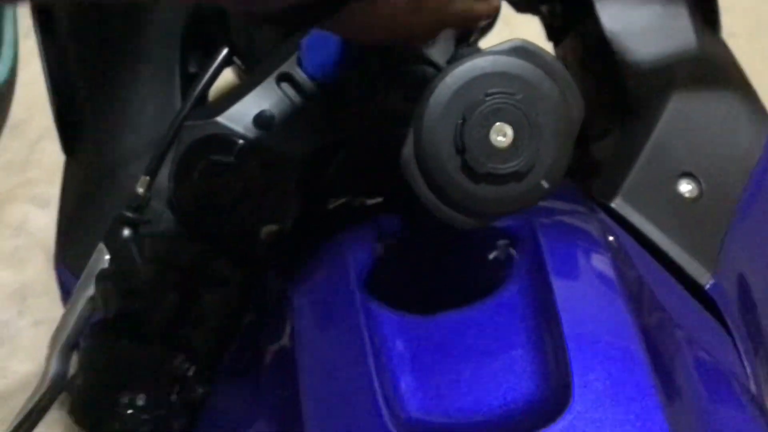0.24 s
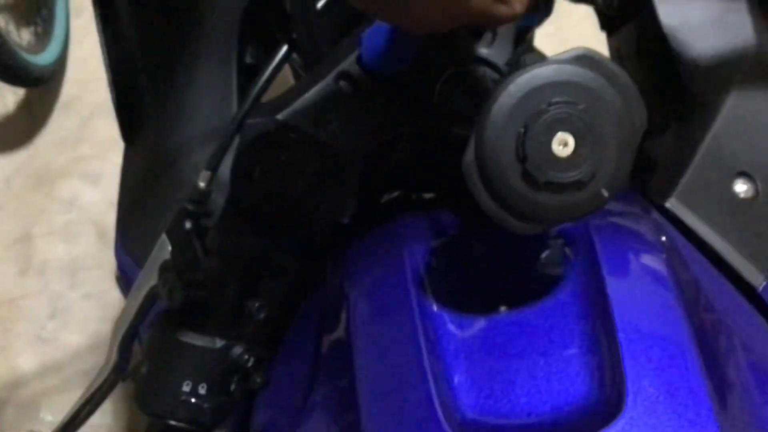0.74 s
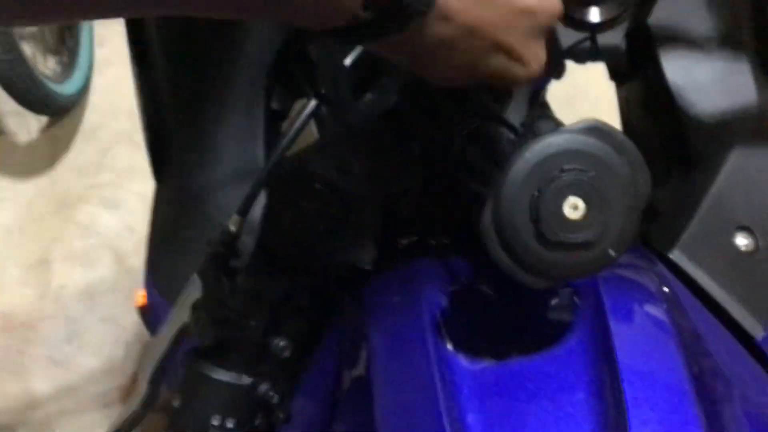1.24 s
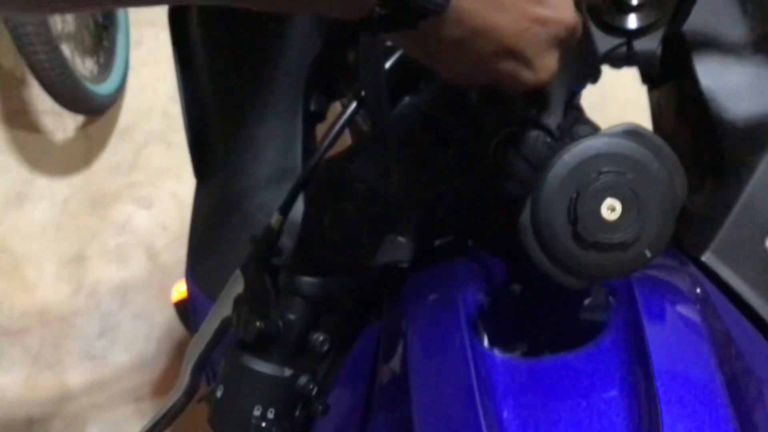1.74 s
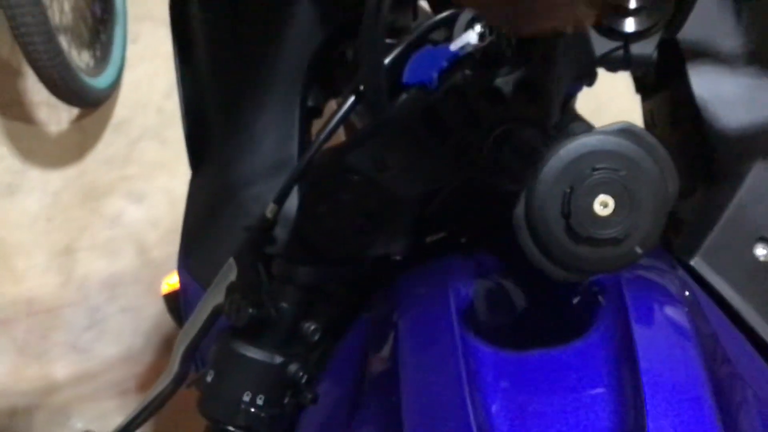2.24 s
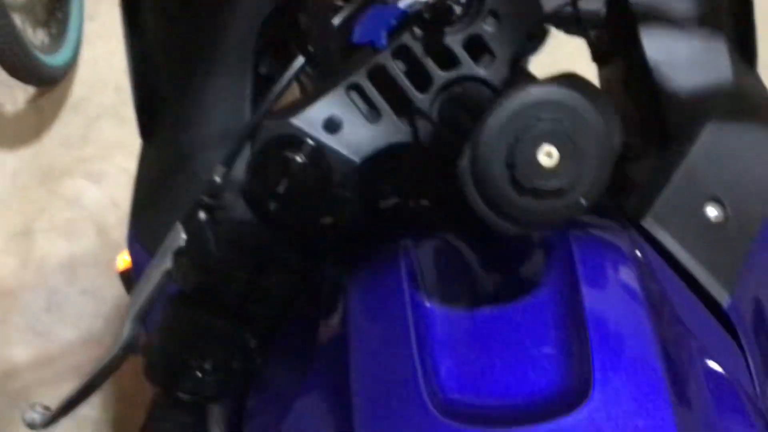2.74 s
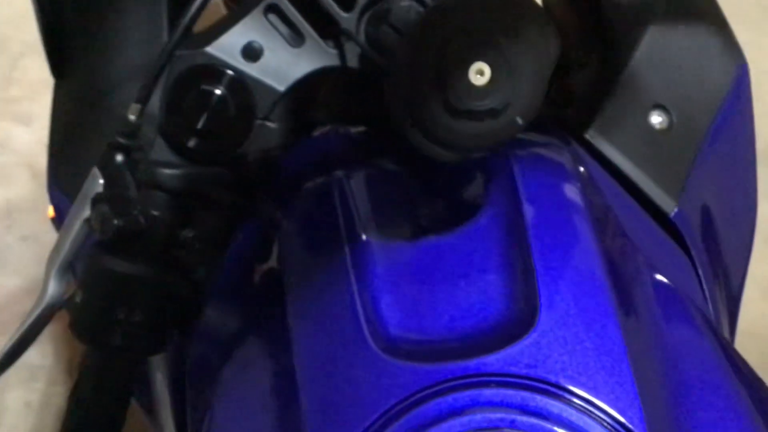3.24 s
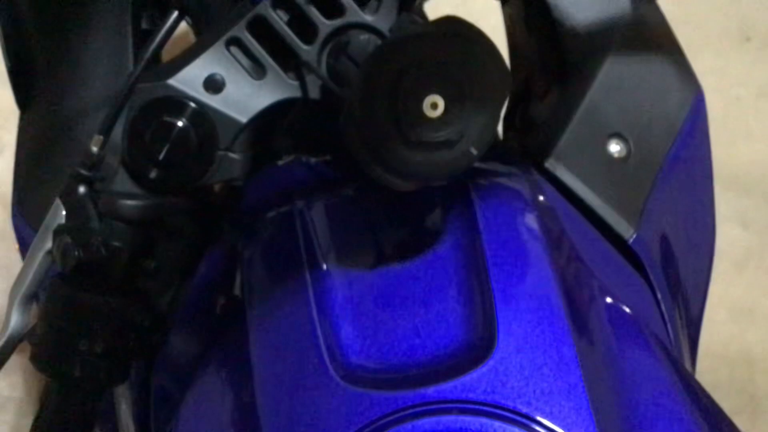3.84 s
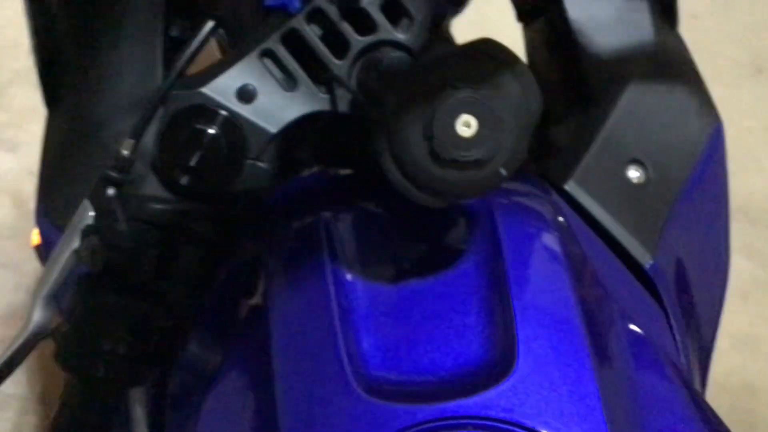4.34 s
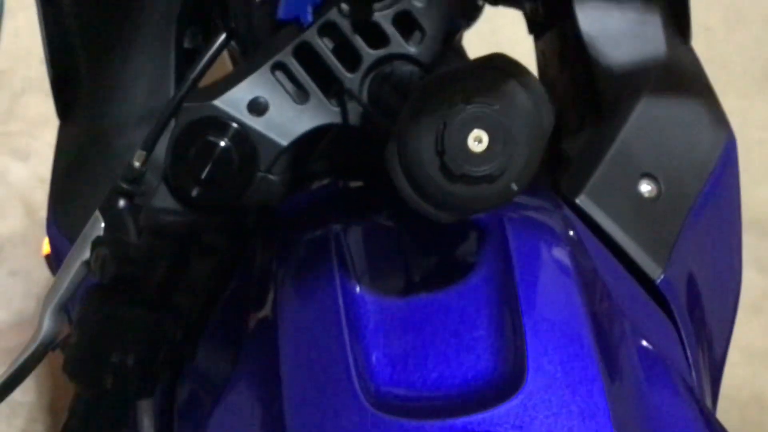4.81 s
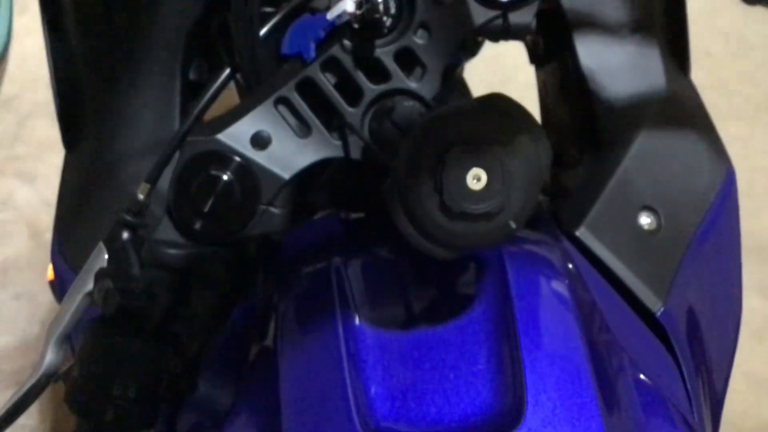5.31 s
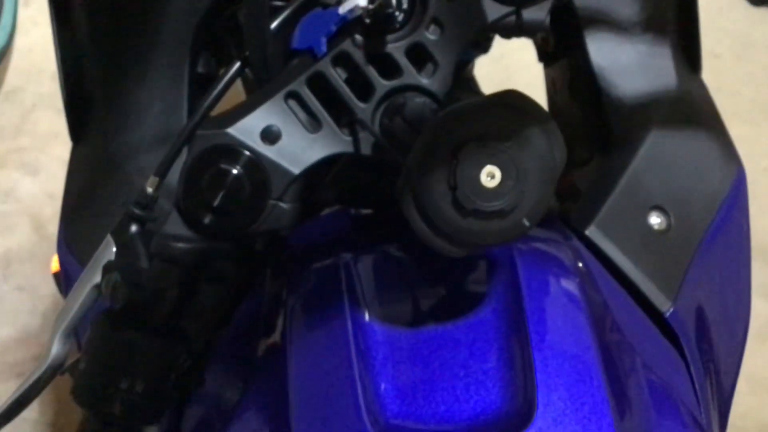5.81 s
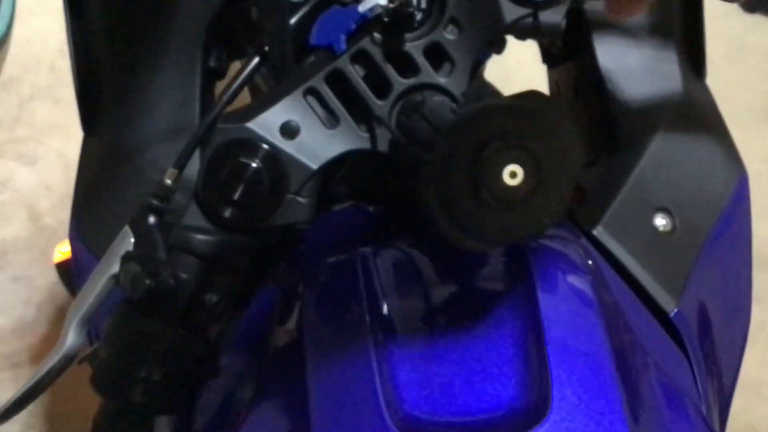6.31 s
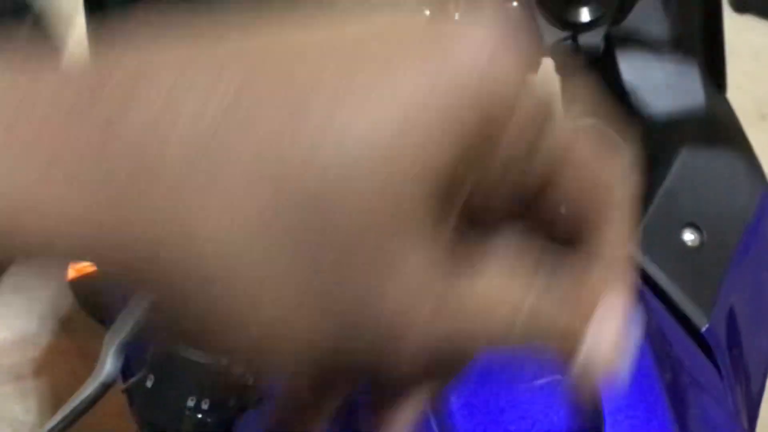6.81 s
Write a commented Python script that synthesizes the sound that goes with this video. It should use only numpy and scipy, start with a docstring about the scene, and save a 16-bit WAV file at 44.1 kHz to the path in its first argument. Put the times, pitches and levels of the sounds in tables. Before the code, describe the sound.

A motorcycle is started indoors: small clicks, dull knocks, a hard clack, a short grinding crank, then a thumping single-cylinder idle with valve clatter.

```python
"""Motorcycle start in a garage

One microphone above the tank of a single-cylinder motorcycle, in still garage air.
Switches click (shaped bursts), levers knock (dull bursts with ringing modes), hands rub (grainy noise).
The relay clacks; the starter's gear partials whine, sag under compression and whistle once freed.
The engine catches and idles: firings ring low resonances and bark, over valve clatter and gas hiss."""
import sys
import numpy as np
from scipy import signal
from scipy.fft import rfft, irfft
from scipy.io import wavfile
from scipy.ndimage import uniform_filter1d

SR = 44100
rng = np.random.default_rng(int(sys.argv[2]) if len(sys.argv) > 2 else 0)


def unload_wav(signal):
    """Save mono or channel-first audio to the path in sys.argv[1] as 16-bit WAV at rate SR, clipped to [-1, 1]."""
    wavfile.write(
        sys.argv[1],
        SR,
        np.round(np.clip(np.atleast_2d(signal).T, -1, 1) * 32767).astype(np.int16),
    )


N = 311624
TIME = np.arange(N) / SR  # seconds

# spectrum of the still garage air: (frequency [Hz], level [dB])
AIR_SPECTRUM = [(15, -51), (25, -36), (43, 1), (66, -2.5), (105, -11.5), (145, -5.5), (249, -13),
                (363, -15), (503, -28), (575, -23.5), (863, -32), (8830, -43.5), (16000, -54)]
# reverberation of the garage: (frequency [Hz], t60 [s])
GARAGE_T60 = [(100, 0.57), (500, 0.68), (1500, 0.62), (5000, 0.55), (9000, 0.47), (16000, 0.16)]
# hands and cables rub before a control moves: (time [s], length [s], level [dB], pitch [Hz], width [Hz])
RUBS = [(1.89,  0.055, -70, 1800, 2500), (2.28, 0.21, -83.5, 3180, 130), (3.005, 0.093, -74.5, 1200, 2500),
        (3.498, 0.053, -58.5, 950, 700)]
# switches and controls: (time [s], level [dB], ring [Hz], hollow body [dB], treble [dB])
CLICKS = [(0.223, -46.5, 1260, 4.5, -7), (1.001, -63, 2500, 8, -18), (1.199, -55.5, 2600, 3, -38),
          (1.231, -47.5, 3960, -7, -4), (1.2656, -36.5, 3320, 1.5, -8.5), (1.938, -50.5, 3380, -2, 5),
          (1.951, -57, 3400, 3, -11), (2.5168, -41, 1620, -14, -2), (2.575, -49, 1650, 9, -32),
          (2.596, -56, 1650, -6, -2), (2.625, -52, 1650, -3, -16), (3.515, -48, 2400, 7.5, 4),
          (3.521, -46.5, 1600, 4, -3), (3.554, -58, 2500, 11.5, -22), (3.795, -64, 1460, 0, -6),
          (3.905, -64.5, 1450, 2, -35), (4.633, -53.5, 4060, -12, -12), (4.7329, -39.5, 4070, -8.5, 0),
          (4.7366, -32.5, 2550, -10, 0)]
# colour of every click's snap: (frequency [Hz], level [dB])
CLICK_SPECTRUM = [(80, -66), (400, -9), (900, -18.5), (1400, 5.5), (2150, 0.5), (2500, 1), (3800, 0.5),
                  (5400, -1), (6800, -9.5), (12000, -9), (15000, -7.5)]
# colour of the plastic cowl: (frequency [Hz], level [dB])
COWL_SPECTRUM = [(80, -10), (300, -1), (720, 1), (950, -3.5), (1300, -4), (1900, -17), (5000, -54)]
# the dash switch rings: (time [s], level [dB])
DASH_CLICK = (.225, -49)
# modes of the dash switch: (frequency [Hz], level [dB], t60 [s])
DASH_MODES = [(732, -2, .035), (1270, 0, .02), (1390, -2, .02)]
# the start button rings: (time [s], level [dB])
BUTTON_CLICK = (4.737, -48)
# modes of the start button: (frequency [Hz], level [dB], t60 [s])
BUTTON_MODES = [(1400, -2, .02), (1500, -20, .7), (1855, -21, .8), (1906, -22, .8), (2503, 0, .025),
                (4285, -3, .02), (5125, 0, .02), (5440, -21, .7), (5647, -1, .02)]
# dull lever knocks through the frame: (time [s], level [dB], decay [s], deep thump [dB])
KNOCKS = [(2.503, -40.5, 0.013, 10), (2.519, -32, 0.011, -4.5), (2.577, -39, 0.004, -2),
          (2.601, -47, 0.01, -12), (2.621, -60, 0.023, 8), (3.059, -61.5, 0.049, -7),
          (3.524, -53, 0.048, 3), (3.583, -45, 0.022, 15.5), (3.611, -51.5, 0.044, 16.5)]
# colour of the knocks: (frequency [Hz], level [dB])
KNOCK_SPECTRUM = [(50, -26), (100, 1.5), (180, -7.5), (240, 4.5), (320, -0.5), (400, 4.5), (500, -2.5),
                  (800, -18.5), (960, -13), (1400, -28), (1610, -12.5), (1850, -21.5), (5000, -47.5)]
# metallic ring of the lever: (frequency [Hz], level [dB], t60 [s])
LEVER_MODES = [(1564, 4.5, 0.21), (1600, 3, 0.27), (1706, -2, 0.15)]
# the starter relay closes and lets go: (time [s], level [dB])
RELAY_CLACKS = [(4.936, -11), (5.9646, -20)]
# crack of the relay contacts: (frequency [Hz], level [dB])
CONTACT_SPECTRUM = [(100, -53), (400, -15), (1100, 13.5), (2100, 3.5), (4200, 4), (7000, -2.5), (8600, 2),
                    (12300, -2.5), (14600, 8), (16000, -1)]
# relay armature and case: (frequency [Hz], level [dB], t60 [s])
RELAY_MODES = [(490, -12, 0.019), (1250, -38, 0.014), (3176, 4.5, 0.0072)]
# partials of the starter gears: (multiple of the mesh rate [1], level [dB])
WHINE_PARTIALS = [(1, 2.5), (2, 1.5), (3, -6), (4, -16), (5, -14.5)]
# grinding of the starter gears: (frequency [Hz], level [dB])
GRIND_SPECTRUM = [(59, -53), (100, -24), (150, -4.5), (219, -9.5), (373, 1.5), (415, -3.5), (524, 0.5),
                  (801, -15), (1520, -9.5), (1680, -10), (2990, -11.5), (3250, -18), (3470, -12.5),
                  (5300, -24), (16000, -38.5)]
# resonances of the starter housing: (frequency [Hz], width [Hz], level [dB])
HOUSING_MODES = [(1560, 43, -11), (1900, 65, 14), (2520, 160, -2.5), (3342, 20, 23.5), (4000, 55, 2),
                 (4580, 230, -7)]
# the starter pinion rings: (time [s], level [dB])
PINION_RINGS = [(5.14, -32), (5.24, -42.5)]
# whistle of the freed starter: (multiple of the commutator rate [1], level [dB])
WHISTLE_PARTIALS = [(2, -8), (4, -2), (5, -10)]
# first uneven firings as the engine catches: (time [s], strength [dB], extra bark [dB])
CATCH = [(5.2363, .3, 3.5), (5.374, -3.5, 4), (5.4682, -.5, 0.5), (5.568, -5.5, 4.5)]
# colour of the engine's mechanical noise: (frequency [Hz], level [dB])
CLATTER_SPECTRUM = [(240, -22.5), (400, -19), (536, 0.5), (879, -15.5), (1130, -18), (1600, -12.5),
                    (1950, -15), (2750, -19), (3300, -18), (4200, -24), (5000, -28.5), (7000, -41.5),
                    (10000, -45.5), (16000, -40)]
# ringing of the engine cases: (frequency [Hz], level [dB], t60 [s])
CASE_MODES = [(1124, 5, 0.053), (1324, 2, 0.063), (1600, -4, 0.023), (1811, 7, 0.032), (3410, -9.5, 0.08)]
# knocks of valves and piston: (share of the cycle [1], level [dB])
TAPS = [(.02, -17.5), (.13, -0.5), (.24, 2), (.4, 1), (.62, -13), (.8, 0)]
# colour of the exhaust bark: (frequency [Hz], level [dB])
BARK_SPECTRUM = [(100, -30.5), (150, 12.5), (175, -4.5), (215, 5), (300, -5), (380, -1.5), (440, -7),
                 (540, -1.5), (620, -9), (800, -19.5), (1500, -17.5), (4000, -48.5)]
# low resonances of exhaust and garage: (frequency [Hz], level [dB], t60 [s])
PIPE_MODES = [(56.2, -33, 0.58), (89.4, -14.5, 0.11), (98.38, -15, 0.24), (140.76, -69, 0.047),
              (198.6, -48.5, 0.99), (298.1, -38.5, 0.38)]
# returns of the boom from the walls: (delay [s], signed share [1])
WALLS = [(.016, -0.8), (.049, 0.99)]

AIR_DB = -66.5
# every click: decay, room level, height and width of its ring
CLICK_DECAY_S, CLICK_ROOM_DB, CLICK_RING_DB, CLICK_RING_OCTAVES = 0.0034, -8, 6.5, .18
# the gear mesh spins up towards its free speed
CRANK_S, FREE_MESH_HZ, SPIN_UP_S = 4.932, 1690, .072
# compression drags it down: moment, share of the speed lost, abruptness
COMPRESSION_S, SAG_SHARE, SAG_S = 5.166, .31, .014
# tooth load as shares of the stall torque, and how long the compression load lasts
DRAG_SHARE, SQUEEZE_SHARE, SQUEEZE_S = 0.048, 0.31, 0.034
# the engine runs away from the starter and the gears fall quiet
RELEASE_S, RELEASE_DB_PER_S = 5.23, 300
# the freed motor's commutator rate at first and at full speed, and its run-up
FREED_HZ, TOP_HZ, RUN_UP_S = 2880, 2935, 0.23
# coasting once the relay opens
COAST_HZ_PER_S, COAST_DB_PER_S = 900, 280
SQUEAL_HZ = 5990
# the idle: first firing, first interval, and how much longer each interval is than the last
IDLE_FROM_S, IDLE_PERIOD_S, SLOWING_S = 5.6485, .0833, .00026
# idle firings start weak and build to full strength
IDLE_DB, WEAK_DB, BUILD_S = -1, -3, 0.05
EDGE_HZ = 15850  # upper band limit


def amp(db):
    """Turns decibels into gain."""
    return 10 ** (np.asarray(db) / 20)


def unit(x):
    """Scales to rms 1."""
    return x / np.sqrt(np.mean(x ** 2) + 1e-20)


def read(points, hz):
    """Reads a spectrum table on a log-frequency axis."""
    f, value = np.transpose(points)
    return np.interp(np.log(hz + 1), np.log(f + 1), value)


def add(mix, s, sound):
    """Mixes a sound in at time s."""
    part = mix[round(s * SR):][:len(sound)]
    part += sound[:len(part)]


def through(x, response):
    """Passes x through an impulse response."""
    return signal.fftconvolve(x, response)[:len(x)]


def colour(points, size=4096):
    """Minimum-phase response of energy 1, shaped by the given spectrum."""
    hz = abs(np.fft.fftfreq(size, 1 / SR))
    log_gain = np.log(amp(np.maximum(read(points, hz), -100)))
    spectrum = np.exp(np.conj(signal.hilbert(log_gain)))
    response = np.fft.ifft(spectrum).real[:size // 2]
    return response / np.linalg.norm(response)


def ring(modes):
    """Struck modes as dying sines; neighbours swing in opposite directions."""
    t = TIME[:SR]
    out = np.zeros(SR)
    for k, (hz, db, t60) in enumerate(modes):
        out += (-1) ** k * amp(db - 60 * t / t60) * np.sin(2 * np.pi * hz * t)
    return out


def resonances(modes):
    """Response of broad resonances, each with its own gain at the peak."""
    t = TIME[:SR // 2]
    out = np.zeros(len(t))
    for hz, width, db in modes:
        peak = amp(db) * 2 * np.pi * width / SR
        out += peak * np.exp(-np.pi * width * t) * np.cos(2 * np.pi * hz * t)
    return out


def waver(size):
    """Smooth random drift of rms 1: noise averaged twice over size samples."""
    once = uniform_filter1d(rng.standard_normal(N), size)
    return unit(uniform_filter1d(once, size))


def burst(decay, rise):
    """A short rush of tiny contacts of random sign (decay and rise in seconds)."""
    t = TIME[:SR // 4]
    contacts = rng.choice([-1., 1.], len(t))
    return contacts * (1 - np.exp(-t / rise)) * np.exp(-t / decay)


def tail(gap=0.0059):
    """Dense reflections of the garage after a gap in seconds, the treble dying first."""
    hz, t, z = signal.stft(rng.standard_normal(SR), SR, nperseg=256)
    decay = amp(-60 * t / read(GARAGE_T60, hz)[:, None])
    echoes = signal.istft(z * decay, SR, nperseg=256)[1][:SR]
    echoes *= np.clip(TIME[:SR] / gap - 1, 0, 1)
    # below 4 kHz the tail carries about the energy of a unit impulse
    middle = signal.sosfilt(signal.butter(2, 4000, fs=SR, output="sos"), echoes)
    return echoes / (np.linalg.norm(middle) * np.sqrt(SR / 8000))


def garage(x, wet_db):
    """Direct sound plus the room; a higher wet_db sounds more distant."""
    wet = amp(wet_db)
    return (x + wet * through(x, tail())) / np.hypot(1, wet)


def blow(decay, rise, room_db):
    """A burst of contacts followed by the diffuse room."""
    contacts = burst(decay, rise)
    out = amp(room_db) * np.linalg.norm(contacts) * tail()
    add(out, 0, contacts)
    return out


def air(level_db=-0.6):
    """Faint low rumble of the surroundings: steady noise shaped by a spectrum."""
    gain = amp(read(AIR_SPECTRUM, np.fft.rfftfreq(N, 1 / SR)))
    rumble = irfft(rfft(rng.standard_normal(N)) * gain, N)
    return amp(AIR_DB + level_db) * unit(rumble)


def rubs(grain_db=4):
    """Grainy friction that swells and fades through one resonance."""
    out = np.zeros(N)
    for s, length, db, hz, width in RUBS:
        grains = rng.standard_normal(N) * amp(grain_db * waver(size=120))
        swell = np.sin(np.pi * np.clip((TIME - s) / length, 0, 1))
        friction = unit(through(grains, resonances([(hz, width, 0)])))
        out += amp(db) * swell * friction
    return garage(out, wet_db=-6)


def clicks(level_db=3, hollow_s=0.0048, rise=0.00098):
    """Each click is a bright snap with a slower hollow answer from the cowl; two controls also ring."""
    out = np.zeros(N)
    hz = np.geomspace(80, 16000, 100)
    for s, db, ring_hz, hollow_db, treble_db in CLICKS:
        tilt_db = read([(4500, 0), (8000, treble_db)], hz)
        octaves_off = np.log2(hz / ring_hz)
        peak_db = CLICK_RING_DB * np.exp(-(octaves_off / CLICK_RING_OCTAVES) ** 2)
        tone = np.c_[hz, read(CLICK_SPECTRUM, hz) + tilt_db + peak_db]
        snap = through(blow(CLICK_DECAY_S, rise, CLICK_ROOM_DB), colour(tone))
        answer = blow(CLICK_DECAY_S + hollow_s, 0.011, CLICK_ROOM_DB)
        hollow = through(answer, colour(COWL_SPECTRUM))
        add(out, s, amp(db + level_db) * (snap + amp(hollow_db) * hollow))
    for (s, db), modes in (DASH_CLICK, DASH_MODES), (BUTTON_CLICK, BUTTON_MODES):
        add(out, s, amp(db) * garage(ring(modes), wet_db=0))
    return out


def knocks(level_db=2.5, ring_db=-29):
    """Dull blows of a lever through the frame, with a faint metallic ring."""
    out = np.zeros(N)
    hz, tone_db = np.transpose(KNOCK_SPECTRUM)
    for s, db, decay, thump_db in KNOCKS:
        tilt_db = read([(110, thump_db), (300, 0)], hz)
        thud = through(burst(decay, 0.00076), colour(np.c_[hz, tone_db + tilt_db]))
        add(out, s, amp(db + level_db) * thud)
        # the soft, deep blows ring least
        add(out, s, amp(db + ring_db - thump_db) * ring(LEVER_MODES))
    return garage(out, wet_db=-9.0)


def relay(crack_db=-3, case_db=3.0, rise=0.0011):
    """A hard, dry clack close by: the contacts crack and the case rings for a moment."""
    out = np.zeros(N)
    for s, db in RELAY_CLACKS:
        crack = through(blow(0.002, 0.0014, room_db=-11.5), colour(CONTACT_SPECTRUM))
        case = ring(RELAY_MODES) * (1 - np.exp(-TIME[:SR] / rise))
        add(out, s, amp(db + crack_db) * crack)
        add(out, s + 0.00097, amp(db + case_db) * case)
    return out


def cranking(load_lag_s=0.0085):
    """Mesh rate [Hz], spin-up (0-1) and tooth load: the starter speeds up, then meets compression."""
    spin = 1 - np.exp(-np.maximum(TIME - CRANK_S, 0) / SPIN_UP_S)
    sag = SAG_SHARE * (1 + np.tanh((TIME - COMPRESSION_S) / (2 * SAG_S))) / 2
    squeeze = SQUEEZE_SHARE * np.exp(-((TIME - COMPRESSION_S - load_lag_s) / SQUEEZE_S) ** 2)
    mesh_hz = FREE_MESH_HZ * spin * (1 - sag)
    load = abs(DRAG_SHARE + 1 - spin + squeeze)
    return mesh_hz, spin, load


def starter(whine_db=-24, grind_db=-29.5, grind_law=0.51, lumpy_db=4, wobble=.009,
            chatter_db=2.5, tooth_depth=0.083, rattle_db=-18):
    """Gear teeth whine and grind; each partial flares as it sweeps through a housing resonance."""
    mesh_hz, spin, load = cranking()
    turns = np.cumsum(mesh_hz * (1 + wobble * waver(size=90))) / SR
    whine = np.zeros(N)
    for k, db in WHINE_PARTIALS:
        whine += amp(db + lumpy_db * waver(size=400)) * np.sin(2 * np.pi * k * turns)
    engaged = amp(-RELEASE_DB_PER_S * np.maximum(TIME - RELEASE_S, 0))
    # the uneven pinion bears harder once a revolution, every nine teeth
    bearing = (1 + tooth_depth * np.cos(2 * np.pi * turns / 9)) * engaged
    whine = unit(whine) * amp(whine_db) * spin ** 2 * load * bearing
    chatter = rng.standard_normal(N) * amp(chatter_db * waver(size=100))
    grind = unit(through(chatter, colour(GRIND_SPECTRUM)))
    grind *= amp(grind_db) * (spin * load) ** grind_law * bearing
    housing = through(whine + amp(rattle_db) * grind, resonances(HOUSING_MODES))
    return garage(.5 * whine + grind + housing, wet_db=-3.0)


def squeal(attack_s=0.048, decay_s=0.033, wobble=0.0084):
    """A thin ring of the starter pinion: each swell rises and dies away."""
    level, t = np.zeros(N), TIME[:SR]
    for s, db in PINION_RINGS:
        add(level, s, amp(db) * (1 - np.exp(-t / attack_s)) * np.exp(-t / decay_s))
    turns = np.cumsum(SQUEAL_HZ * (1 + wobble * waver(size=60))) / SR
    return level * np.sin(2 * np.pi * turns)


def overrun(level_db=-72, swell_db_per_s=9, wobble=0.0051, flutter_db=4):
    """The freed starter whistles at multiples of its commutator rate, then coasts once the relay lets go."""
    freed = np.maximum(TIME - RELEASE_S, 0)
    coasting = np.maximum(TIME - RELAY_CLACKS[1][0], 0)
    run_up_hz = TOP_HZ + (FREED_HZ - TOP_HZ) * np.exp(-freed / RUN_UP_S)
    hz = run_up_hz - COAST_HZ_PER_S * coasting
    db = level_db + swell_db_per_s * freed - COAST_DB_PER_S * coasting
    turns = np.cumsum(hz * (1 + wobble * waver(size=60))) / SR
    whistle = sum(amp(line_db) * np.sin(2 * np.pi * k * turns) for k, line_db in WHISTLE_PARTIALS)
    level = (freed > 0) * amp(db + flutter_db * waver(size=1500))
    return garage(level * whistle, wet_db=-1)


def firings(jitter_s=.0002, uneven_db=0.35):
    """Rows (time [s], strength [dB], extra bark [dB]): the catch, then an idle that slowly sags."""
    k = np.arange(int((TIME[-1] - IDLE_FROM_S) / IDLE_PERIOD_S))
    late, strong = rng.standard_normal((len(k), 2)).T
    s = IDLE_FROM_S + k * IDLE_PERIOD_S + SLOWING_S * k ** 2 / 2
    db = IDLE_DB + WEAK_DB * np.exp((IDLE_FROM_S - s) / BUILD_S) + uneven_db * strong
    idle = np.c_[s + jitter_s * late, db, np.zeros(len(k))]
    return np.vstack([CATCH, idle])


def cycle(starts):
    """Position 0-1 within the four-stroke cycle."""
    s = np.append(starts, 2 * starts[-1] - starts[-2])
    return np.interp(TIME, s, np.arange(len(s))) % 1


def hiss(fired, level_db=-58.0, opens=.93, decay=1.0, uneven_db=0.7):
    """Gas hisses through the head from the opening of the valve and dies away over the cycle."""
    # (frequency [Hz], level [dB])
    tone = [(3000, -2), (5000, 3.5), (7200, -35), (8600, 1), (10000, -4.5), (11000, 0),
            (12000, -9), (13000, -3), (14700, 0)]
    jet = through(rng.standard_normal(N), colour(tone)) * amp(uneven_db * waver(size=800))
    since_opening = (cycle(fired[:, 0]) - opens) % 1  # in cycles, like opens and decay
    alight = TIME > CATCH[0][0]
    return amp(level_db) * alight * jet * np.exp(-since_opening / decay)


def clatter_gain(starts, fade=0.047, db_per_octave=6, settle_db_per_s=1.2):
    """Clatter fades in just before the first firing, grows with crank speed and eases as the oil spreads."""
    octaves = np.interp(TIME, starts, np.log2(IDLE_PERIOD_S / np.gradient(starts)))
    fade_in = np.clip((TIME - starts[0]) / fade + 1, 0, 1)
    settling_db = settle_db_per_s * np.maximum(TIME - IDLE_FROM_S, 0)
    return fade_in * amp(db_per_octave * octaves - settling_db)


def clatter(fired, level_db=-38.5, taps_db=-10, cases_db=-7, swing_db=2.0, loudest=0.051,
            scatter_db=3, uneven_db=-0.1):
    """Chain and gears rush with the crank speed; valves and piston tap the cases."""
    starts, taps = fired[:, 0], np.zeros(N)
    for s, period in zip(starts, np.gradient(starts)):
        for share, db in TAPS:
            tap_db = db + scatter_db * rng.standard_normal()
            add(taps, s + share * period, amp(tap_db) * burst(0.0091, 0.0001))
    on = TIME > starts[0]
    swing = swing_db * np.cos(2 * np.pi * (cycle(starts) - loudest))
    rush = rng.standard_normal(N) * amp(swing + uneven_db * waver(size=700))
    # oil and casing soften the taps
    taps = signal.sosfilt(signal.butter(2, 2400, fs=SR, output="sos"), taps)
    drive = rush + amp(taps_db) * taps / np.std(taps[on])
    body = through(drive, colour(CLATTER_SPECTRUM))
    cases = through(drive, ring(CASE_MODES))
    both = body / np.std(body[on]) + amp(cases_db) * cases / np.std(cases[on])
    return amp(level_db) * clatter_gain(starts) * garage(both, wet_db=-7.5)


def bark(fired, level_db=-35.5, rough=1.2, echo_s=.033, echo_db=-0.5):
    """Blowdown: each firing is a puff, half the same and half freshly rough, with its slap off the wall."""
    same, puffs = burst(0.0091, 0.0011), np.zeros(N)
    for s, db, extra_db in fired:
        puff = amp(db + extra_db) * (same + rough * burst(0.0099, 0.0028))
        add(puffs, s, puff)
        add(puffs, s + echo_s, amp(echo_db) * puff)
    sound = garage(through(puffs, colour(BARK_SPECTRUM)), wet_db=-3)
    return amp(level_db) * sound / np.std(sound[TIME > CATCH[0][0]])


def boom(fired, level_db=2.27):
    """Each firing rings the low resonances; the walls send the boom back."""
    pulses = np.zeros(N)
    for s, db, _ in fired:
        add(pulses, s, amp([db]))
    direct = through(pulses, ring(PIPE_MODES))
    out = direct.copy()
    for delay, share in WALLS:
        add(out, delay, share * direct)
    return amp(level_db) * out


def scene():
    """All sources, near and far, at one microphone."""
    fired = firings()
    controls = rubs() + clicks() + knocks()
    starting = relay() + starter() + squeal() + overrun()
    engine = hiss(fired) + clatter(fired) + bark(fired) + boom(fired)
    return (air() + controls + starting + engine)[None]


def record(dry):
    """The microphone drops the deepest bass; a steep low-pass then limits the band."""
    hz = np.fft.rfftfreq(2 * N, 1 / SR)
    bass_db = read([(20, -29), (38, -25.5), (52, 1.5)], hz)
    thinned = irfft(rfft(dry, 2 * N) * amp(bass_db))[:, :N]
    low_pass = signal.firwin(511, EDGE_HZ, window=("kaiser", 9), fs=SR)
    return signal.oaconvolve(thinned, low_pass[None], "same")


dry = scene()
out = record(dry)
unload_wav(out)
```